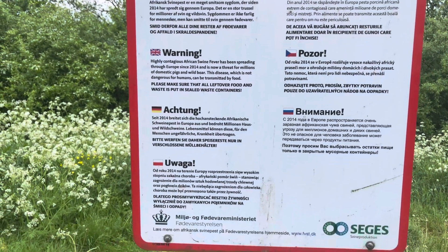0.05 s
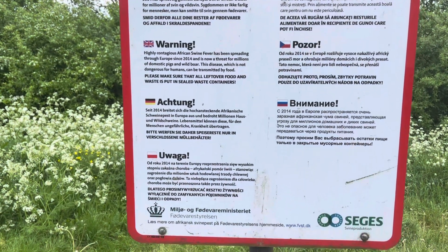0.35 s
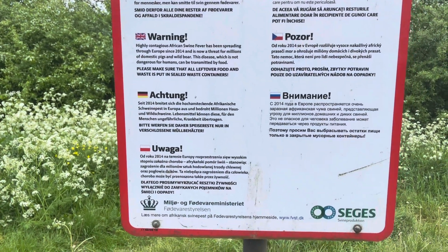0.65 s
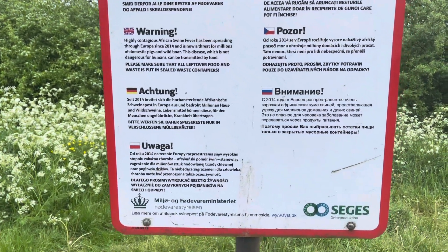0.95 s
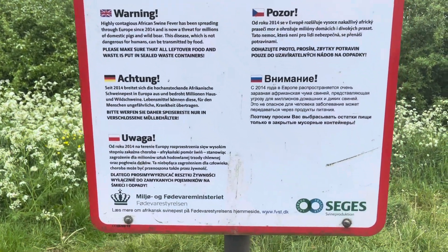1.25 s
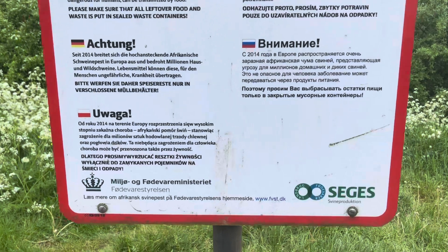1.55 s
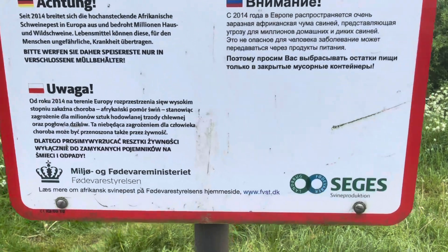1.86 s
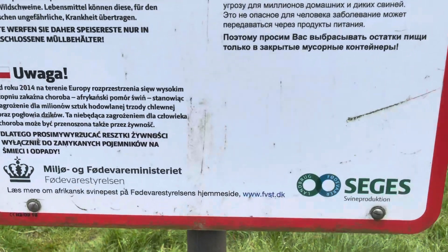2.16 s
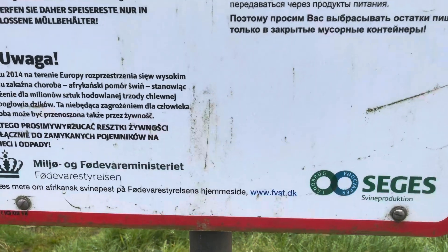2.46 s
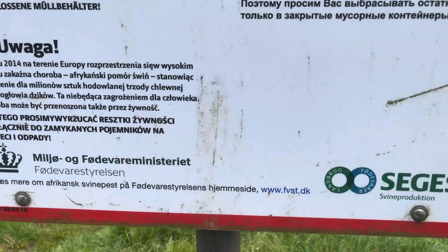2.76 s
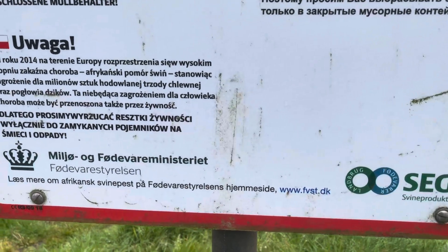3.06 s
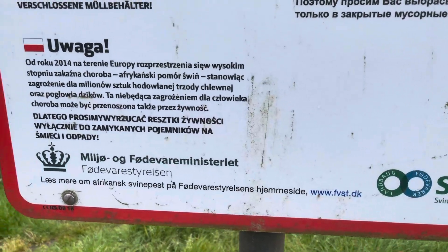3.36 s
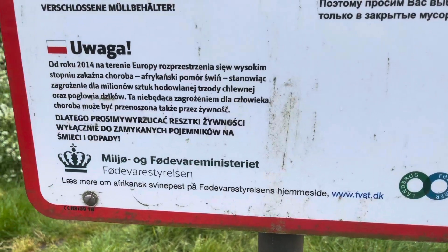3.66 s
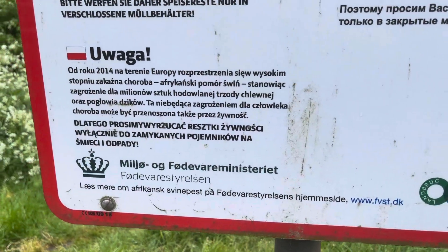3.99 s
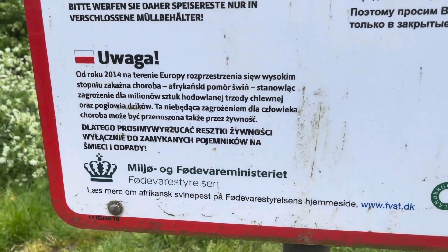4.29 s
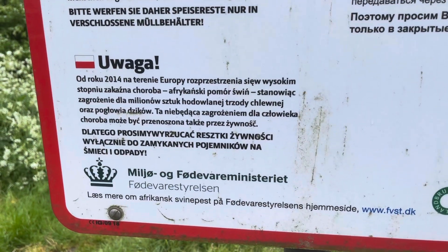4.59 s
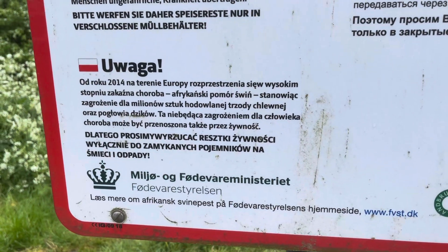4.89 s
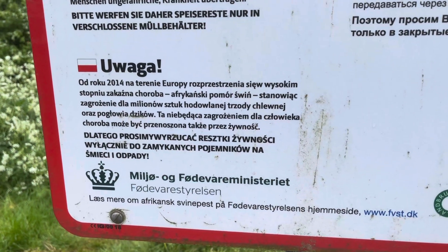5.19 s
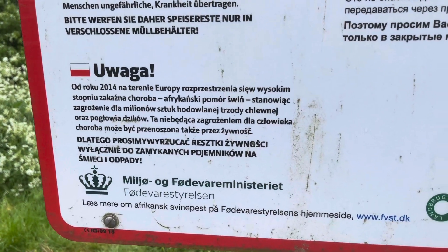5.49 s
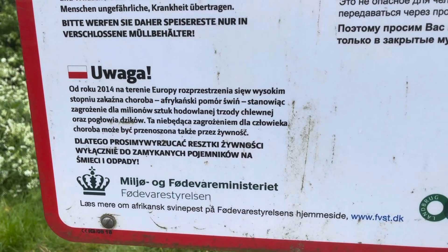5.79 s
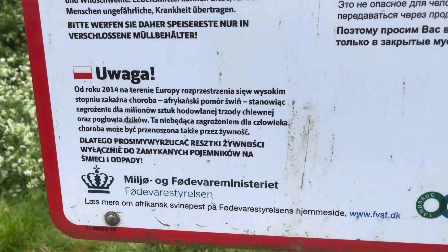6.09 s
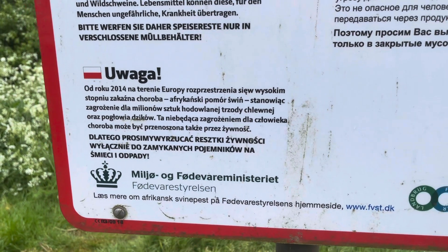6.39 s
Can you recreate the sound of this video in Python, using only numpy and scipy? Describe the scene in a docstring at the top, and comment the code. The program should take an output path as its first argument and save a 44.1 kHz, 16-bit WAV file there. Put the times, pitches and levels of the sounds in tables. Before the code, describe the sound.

Outdoors, distant diesel engines idle in a steady low drone while far traffic roars from the left under a thin hiss. An air brake hisses once at the start, and a lorry pulls away, changes gear and pulls again. Later something loose taps in quick, regular pairs over a faint whirr. Fingers occasionally knock, tick and scuff on the hand-held microphone.

```python
"""A low diesel drone and one hiss of an air brake: a lorry pulls away and changes gear while two distant
engines idle. Far traffic roars from the left under a thin hiss. Its echo off a signboard adds a hollow
note that rises as the listener nears the board, then fades. Later something loose on a turning part
taps in pairs over a faint whirr. Now and then fingers knock, tick and scuff on a hand-held camera."""
import sys
import numpy as np
from scipy import signal
from scipy.fft import rfft, irfft
from scipy.io import wavfile

SR = 44100
rng = np.random.default_rng(int(sys.argv[2]) if len(sys.argv) > 2 else 0)


def wrap_up_sound(samples):
    """Save the sound to the file named by the first command line argument, as 16-bit audio."""
    columns = np.atleast_2d(samples).T
    # keep every value between -1 and 1, then stretch to whole-number steps
    tamed = np.clip(columns, -1, 1)
    steps = np.round(tamed * 32767).astype(np.int16)
    wavfile.write(sys.argv[1], SR, steps)


N = 288414
TIME = np.arange(N) / SR
BINS = np.fft.rfftfreq(N, 1 / SR)
RUMBLE_DB = (-36.5, -33.5)  # far from the board, close to it

# the lorry's pull in each gear: throttle on t/s, throttle off t/s, rise/s, starting firing f/Hz,
# climb/(Hz/s), level/dB, fade/(dB/s)
GEARS = [(-0.76, 1.12, 1.1, 47.8, 5.9, -23.1, 0.3), (2.05, 5.7, 1.45, 41.3, 4.6, -27.5, 0.8)]
# partials of the nearer idling engine: multiple of the cycle rate, level/dB
IDLE_ORDERS = [(1, -39.5), (2, -25), (3, -35), (4, -33), (5, -45), (6, -47), (8, -52.5), (11, -56.5)]
# hums of fans and belts: f/Hz, level/dB
FAN_HUMS = [(69.3, -36.5), (102.3, -44), (137, -49), (167.3, -48.5), (202.3, -47), (235, -53.5),
            (285, -63.5)]
# colour of the brake's air jet: f/Hz, relative level/dB
JET_SPECTRUM = [(400, -20), (1000, -7), (1600, -5.5), (2450, -4.5), (3600, -8.2), (4700, -7), (5500, -4.5),
                (6050, -6), (6700, -2.5), (7400, -4.5), (8600, -2), (9500, -4.5), (10500, -8.5),
                (11300, -9), (12800, -23.5)]
# ring of the brake's outlet: f/Hz, half-width/Hz, level/dB, fall/(dB/s)
OUTLET_MODES = [(5900, 140, -37, 95), (6280, 140, -39.5, 60), (6740, 460, -37.5, 60)]
# colour of the traffic's engine rumble: f/Hz, relative level/dB
RUMBLE_SPECTRUM = [(20, -17), (31, -12), (37, -3.5), (55, -3), (70, 5), (95, 2.5), (130, 0.2), (170, -2),
                   (225, -4), (260, -7.5), (350, -17), (600, -82)]
# colour of the road roar: f/Hz, relative level/dB
ROAR_SPECTRUM = [(150, -28), (300, -1), (390, -1.5), (520, -0.5), (680, -2), (900, -3.5), (1150, -3),
                 (1500, -7.5), (2000, -11.5), (2700, -16), (3800, -23.5), (5500, -27), (9000, -63)]
# singing tyre bands: f/Hz, half-width/Hz, level far from the board/dB, level close/dB, fade/(dB/s)
TYRE_BANDS = [(501.3, 14.5, -52.5, -52.5, 1.16), (555, 18, -50, -52, 1), (753, 120, -75, -59, -1),
              (1015, 48, -54, -58.5, 0.1), (1680, 88, -76, -66.5, -1.8), (1973, 104, -73, -60, -0.56),
              (2600, 130, -72, -62, 1.6), (2940, 730, -50, -49, 3), (4590, 290, -75, -60, 2)]
# gap between listener and signboard: t/s, distance/m
BOARD_GAP = [(.1, 0.49), (.6, 0.54), (1.2, 0.48), (1.65, 0.42), (2.1, 0.353), (2.6, 0.29)]
# one pair of taps a turn: main tap t/s, its strike level/dB, strike level of the tap just before/dB
TAP_PAIRS = [(4.215, -32, -37), (4.450, -27, -28), (4.677, -25, -28), (4.906, -29, -36),
             (5.139, -27.5, -29.5), (5.366, -26.5, -27.5), (5.595, -30.5, -33), (5.828, -31, -33),
             (6.057, -27, -35), (6.289, -28, -31), (6.522, -26.5, -33)]
# ring of a tap: f/Hz, relative level/dB, t60/s
TAP_MODES = [(664, 3.5, 0.032), (517, 1.5, 0.014), (1030, -3, 0.024)]
# soft knocks on the camera body: t/s, level/dB, ring f/Hz
KNOCKS = [(.997, -34, 560), (1.1775, -22, 525), (4.2825, -22.5, 580)]
# finger ticks: t/s, level/dB, f/Hz, width/Hz, length/s
TICKS = [(2.154, -46, 8200, 1900, 0.0045), (2.55, -60, 4150, 250, .04), (3.399, -49, 2067, 250, 0.039),
         (4.035, -53.5, 4200, 500, 0.034), (4.027, -51, 7570, 1310, 0.036), (4.086, -64, 11500, 1700, .06),
         (4.96, -65, 9500, 2200, 0.072), (5.015, -59.5, 4870, 600, .035)]
# finger scuffs: t/s, level/dB, length/s
SCUFFS = [(2.754, -46.5, 0.074), (3.222, -51.5, 0.13), (5.482, -50, 0.038)]
# resonances of the camera's shell: f/Hz, relative level/dB
SHELL_MODES = [(1050, 0.5), (2200, -2), (4200, -10)]
# colour of the high hiss: f/Hz, relative level/dB
HISS_SPECTRUM = [(1500, -8), (3300, -13.5), (4200, -11), (5400, -7.5), (6000, -1.5), (6600, 3.5), (7200, 1),
                 (8000, -3.5), (9400, -10), (10500, -23.5), (11300, -18.5), (11900, -54)]
# fader curve of the high hiss: t/s, level/dB
HISS_LEVEL = [(.8, -49.5), (1.7, -50.5), (2.8, -49), (4.2, -50), (6.2, -52)]
# resonances of the whirr: start t/s, f/Hz, half-width/Hz, level/dB
WHIRR_BANDS = [(4.15, 640, 70, -54), (4.4, 1010, 16, -58.5)]
# how alike the noise is in both ears: f/Hz, correlation from 0 to 1
EAR_LIKENESS = [(120, .997), (270, .96), (600, .72), (1100, .65), (1900, .5), (2600, .85), (3700, .5),
                (5300, .45), (6500, .82), (7300, .6), (8500, .9)]
# left ear over right: f/Hz, level/dB
LEFT_BALANCE = [(100, 4), (200, -4), (350, -3.5), (1100, -2), (2500, -1.5), (3800, 1.2), (5200, 2.5),
                (6200, 1.5), (7200, 4.5), (8500, 0)]
# lead of the left ear for the ambience: f/Hz, phase/rad
AMBIENT_LEAD = [(0, 0), (1460, 3.5), (2240, 6.5), (2930, 7.5), (3880, 6.5), (5170, 8.0), (6030, 6),
                (7150, 8), (7670, 6.5), (8870, 7.5), (9730, 3), (10900, 6), (11400, 7), (12400, 15.5)]
# lead of the left ear for the air brake: f/Hz, phase/rad
BRAKE_LEAD = [(0, 3.8), (1290, 2.1), (2150, 5.6), (3270, 8.5), (3700, 7.7), (4310, 12.3), (5080, 13.8),
              (5770, 17.3), (7060, 20.6), (7320, 24.6), (7840, 19.2), (8870, 17.8), (11800, 13.1),
              (12400, 14.4)]


def lorry(governed_hz=57.7, coast_hz_per_s=4, coast_db_per_s=28, overtone_db=-24, waver_db=0.5):
    """The exhaust booms at the firing rate: it climbs to the governor, then sags and dies off throttle."""
    out = np.zeros(N)
    for on, off, rise, first_hz, climb, db, recede in GEARS:
        firing_hz = np.minimum(first_hz + climb * since(on), governed_hz) - coast_hz_per_s * since(off)
        level_db = db + waver_db * drift(1.5) - recede * since(on) - coast_db_per_s * since(off)
        phase = 2 * np.pi * (np.cumsum(firing_hz) / SR + rng.random())
        boom = np.cos(phase) + gain_of(overtone_db) * np.cos(2 * phase)
        out += ramp(on, rise) * gain_of(level_db) * boom
    return np.sqrt(2) * out * pan(1.0)


def idling_engines(cycle_hz=37.09, second_hz=64.15, waver_db=0.72, wander_turns=0.035):
    """Two diesels idle under the hum of fans and belts; their firing tones beat ten times a second."""
    turns = cycle_hz * TIME + 0.011 * drift(0.34)
    rumble_db = approach(*RUMBLE_DB)
    swell = gain_of(rumble_db - rumble_db.mean())  # overtones and hums grow with the rumble
    out = np.zeros(N)
    for order, db in IDLE_ORDERS:
        level = gain_of(db + waver_db * drift(2.5)) * (swell if order > 2 else 1)
        out += level * np.cos(2 * np.pi * (order * turns + rng.random()))
    for hz, db in FAN_HUMS:
        level = gain_of(db + waver_db * drift(1.0)) * swell
        out += level * np.cos(2 * np.pi * (hz * TIME + wander_turns * drift(2.1) + rng.random()))
    eased = ramp(4.8, 0.51)  # the drone eases near the end, the second engine most
    second_turns = second_hz * TIME + wander_turns * drift(1.5) + rng.random()
    second_db = approach(-30.5, -27.5) - 1.5 * eased + drift(1.8)
    out += gain_of(second_db) * np.cos(2 * np.pi * second_turns)
    return np.sqrt(2) * out * gain_of(-0.66 * eased) * pan(0.32)


def air_brake(open_s=0.097, attack_s=0.12, hold_s=0.086, shut_s=0.6, jet_db=-30,
              fall_db_per_s=30, shut_db_per_s=38, chirp_s=0.108, chirp_db=-36.5):
    """The valve chirps open; the jet swells and rings in the outlet, then dies as the pressure falls."""
    falling_s = since(open_s + attack_s + hold_s)
    jet = stereo_noise(JET_SPECTRUM, BRAKE_LEAD) * gain_of(jet_db - fall_db_per_s * falling_s)
    for hz, width, db, fall in OUTLET_MODES:
        jet += stereo_noise(hump(hz, width), BRAKE_LEAD) * gain_of(db - fall * falling_s)
    valve = ramp(open_s, attack_s) ** 0.6 * gain_of(-shut_db_per_s * since(shut_s))
    chirp_age = TIME - chirp_s
    sagging_hz = 6350 - 3000 * chirp_age
    chirp = band(sagging_hz, width_hz=25) * np.exp(-(chirp_age / 0.012) ** 2)
    return jet * valve + gain_of(chirp_db) * chirp


def traffic(roar_db=-41, flutter_db=1.07, recede_s=6, recede_db_per_s=4.5):
    """Far engines rumble, receding at the very end, and tyres roar and sing from the left."""
    rumble = stereo_noise(RUMBLE_SPECTRUM)
    rumble *= gain_of(approach(*RUMBLE_DB) + drift(2.2) - recede_db_per_s * since(recede_s))
    roar = stereo_noise(ROAR_SPECTRUM) * gain_of(roar_db + flutter_db * drift(17.6))
    for hz, width, far_db, near_db, fade in TYRE_BANDS:
        roar += gain_of(approach(far_db, near_db) - fade * TIME) * stereo_noise(hump(hz, width))
    return rumble + roar


def board_echo(sound, hollow_width_hz=140, dip_width_hz=120, dip_depth=0.46, screened_db=-13.5):
    """The echo lifts the sound where the gap is half a wavelength and scoops it out a little lower."""
    hollow_hz = 343 / (2 * follow(BOARD_GAP))
    dip_hz = 0.64 * hollow_hz
    screened = ramp(1.98, 0.45)  # the board comes to screen the road
    hollow_db = approach(-6.5, 3.5) + screened_db * screened
    hollow = resonate(resonate(sound, hollow_hz, hollow_width_hz), hollow_hz, hollow_width_hz)
    dip = resonate(resonate(sound, dip_hz, dip_width_hz), dip_hz, dip_width_hz)
    return sound + gain_of(hollow_db) * hollow - dip_depth * dip


def tapping(pair_gap_s=0.029, rise_s=0.001, right_delay_s=0.00038):
    """Something loose on a turning part taps twice a turn, with a short hollow ring."""
    age = TIME[:SR // 8]
    ring = sum(gain_of(db - 60 * age / t60) * np.sin(2 * np.pi * hz * age) for hz, db, t60 in TAP_MODES)
    ring *= 1 - np.exp(-age / rise_s)
    blows = np.zeros(N)
    for s, main_db, lead_db in TAP_PAIRS:
        blows[round((s - pair_gap_s) * SR)] = gain_of(lead_db)
        blows[round(s * SR)] = gain_of(main_db)
    left = signal.oaconvolve(blows, ring)[:N]
    right = np.interp(TIME - right_delay_s, TIME, left)
    return np.array([left, right]) * pan(-1.9)


def handling(knock_rise_s=0.0032):
    """Fingers knock the damped camera body for a few cycles, and tick and scuff on its shell."""
    out = np.zeros(N)
    for s, db, hz in KNOCKS:
        age = since(s)
        envelope = (age / knock_rise_s * np.exp(1 - age / knock_rise_s)) ** 3
        out += gain_of(db) * envelope * np.sin(2 * np.pi * hz * age)
    grain = unit_rms(gain_of(drift(250)))  # skin catches and slips
    for s, db, hz, width, length in TICKS:
        out += gain_of(db) * touch(s, length) * grain * band(hz, width)
    shell = grain * sum(gain_of(db) * band(hz, width_hz=0.3 * hz) for hz, db in SHELL_MODES)
    for s, db, length in SCUFFS:
        out += gain_of(db) * touch(s, length) * shell
    return out * pan(1.0)


def high_hiss(flutter_db=0.73):
    """A thin bed of hiss, fluttering slightly, high above the traffic."""
    return stereo_noise(HISS_SPECTRUM) * gain_of(follow(HISS_LEVEL) + flutter_db * drift(26))


def whirr(rise_s=0.26):
    """Narrow bands of noise fade in with the tapping as a faint hollow whirr."""
    return sum(gain_of(db) * ramp(s, rise_s) * stereo_noise(hump(hz, width))
               for s, hz, width, db in WHIRR_BANDS)


def stereo_noise(spectrum, lead=AMBIENT_LEAD, ripple_db=0.95, full_ripple_hz=1500):
    """Coloured noise of rms 1, rippled by nearby reflections; the camera delays and shades one side."""
    left, unrelated = rfft(rng.standard_normal((2, N)))
    likeness = at_bins(EAR_LIKENESS)
    delay = np.exp(-1j * np.interp(BINS, *np.transpose(lead)))
    right = likeness * left * delay + np.sqrt(1 - likeness ** 2) * unrelated
    shade = gain_of(at_bins(LEFT_BALANCE) / 2)
    echoes = rng.standard_normal(N) * (TIME > 0.002) * (TIME < 0.012)
    ripple = ripple_db * unit_rms(rfft(echoes).real) * np.minimum(BINS / full_ripple_hz, 1)
    colour = gain_of(at_bins(spectrum) + ripple)
    return unit_rms(irfft(np.array([left * shade, right / shade]) * colour, N))


def band(centre_hz, width_hz):
    """Noise in one resonance, steady or gliding."""
    phase = 2 * np.pi * np.cumsum(centre_hz * np.ones(N)) / SR
    return unit_rms(drift(width_hz) * np.cos(phase) + drift(width_hz) * np.sin(phase))


def resonate(x, hz, width_hz):
    """A band-pass of gain 1 swept along the curve hz."""
    carrier = np.exp(2j * np.pi * np.cumsum(hz) / SR)
    pole = np.exp(-np.pi * width_hz / SR)
    return 2 * (carrier * signal.lfilter([1 - pole], [1, -pole], x / carrier)).real


def hump(hz, half_width):
    """The spectrum of one resonance: f/Hz, level/dB."""
    return [(hz - 4 * half_width, -60), (hz - half_width, -6), (hz, 0),
            (hz + half_width, -6), (hz + 4 * half_width, -60)]


def drift(rate_hz):
    """A smooth random wobble of rms 1."""
    lowpass = np.exp(-(BINS / rate_hz) ** 2) * (BINS > 0)
    return unit_rms(irfft(rfft(rng.standard_normal(N)) * lowpass, N))


def approach(far_db, near_db):
    """A level that rides the listener's approach to the board."""
    gap_m = follow(BOARD_GAP)
    nearness = (gap_m.max() - gap_m) / np.ptp(gap_m)
    return far_db + (near_db - far_db) * nearness


def touch(s, length_s):
    """The soft arch of a finger's contact."""
    return np.sin(np.pi * ramp(s, length_s))


def ramp(s, length_s):
    """A linear fade from 0 to 1, starting at s."""
    return np.minimum(since(s) / length_s, 1)


def since(s):
    """Seconds since a moment, zero before it."""
    return np.maximum(TIME - s, 0)


def follow(curve):
    """A time curve at every sample."""
    return np.interp(TIME, *np.transpose(curve))


def at_bins(spectrum):
    """A spectrum table at every frequency bin."""
    hz, value = np.transpose(spectrum)
    return np.interp(np.log(BINS + 1), np.log(hz + 1), value)


def pan(left_db):
    """Channel gains for a level of left over right."""
    return gain_of([[left_db / 2], [-left_db / 2]])


def gain_of(db):
    """Decibels to amplitude."""
    return 10 ** (np.asarray(db) / 20)


def unit_rms(x):
    """Scales to rms 1."""
    return x / np.sqrt(np.mean(x ** 2) + 1e-20)


def scene():
    """The stereo mix; the board colours only the idling engines and the traffic."""
    drone = board_echo(idling_engines() + traffic())
    return drone + lorry() + high_hiss() + air_brake() + tapping() + whirr() + handling()


def record(dry, cutoff_hz=12840):
    """A steep low-pass trims the top end."""
    lowpass = signal.firwin(511, cutoff_hz, window=("kaiser", 9), fs=SR)
    return signal.oaconvolve(dry, lowpass[None], "same")


dry = scene()
out = record(dry)
wrap_up_sound(out)
```